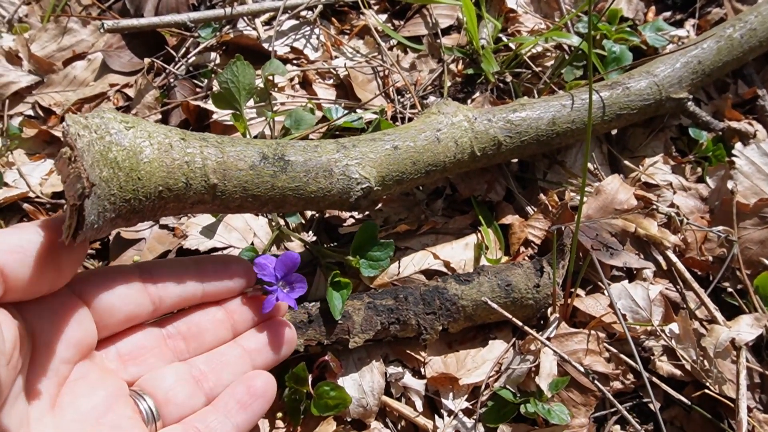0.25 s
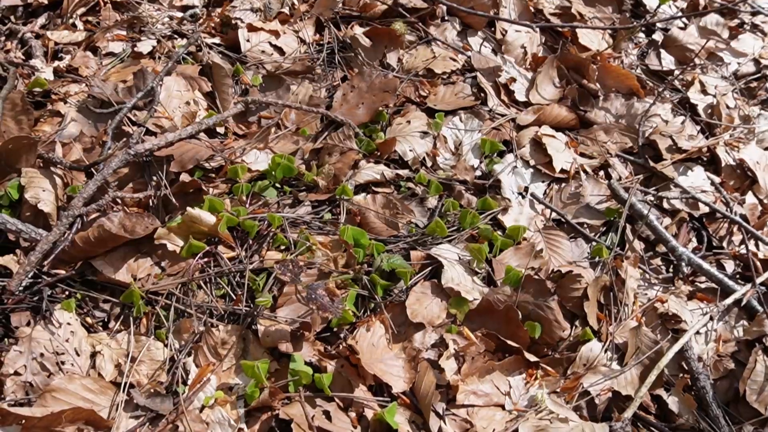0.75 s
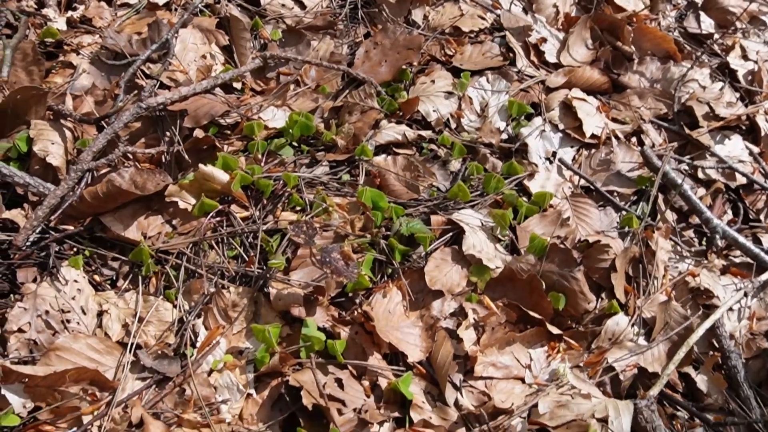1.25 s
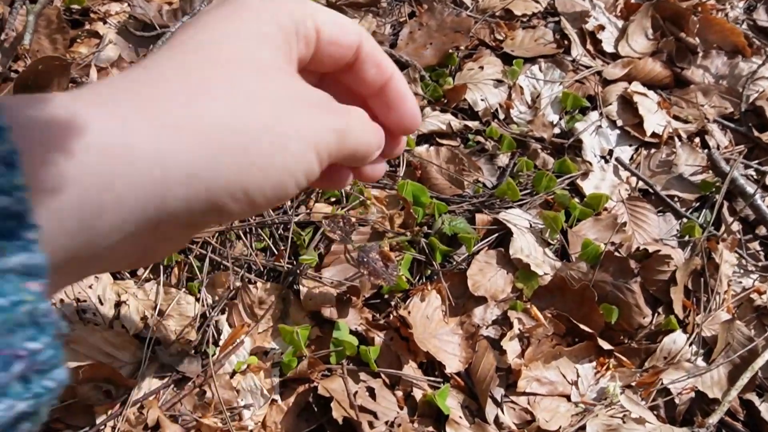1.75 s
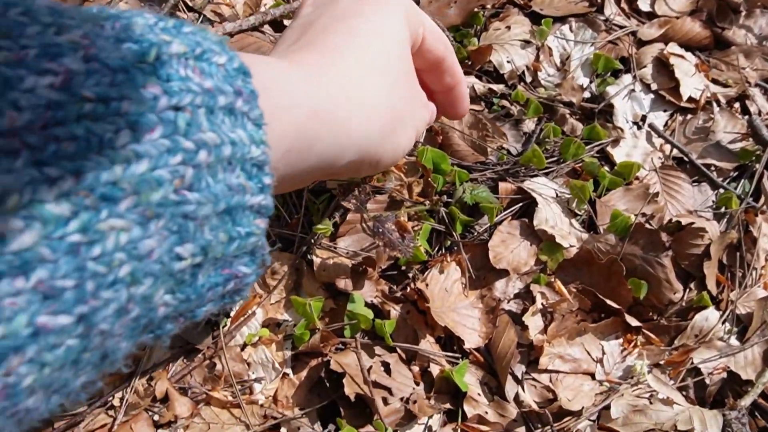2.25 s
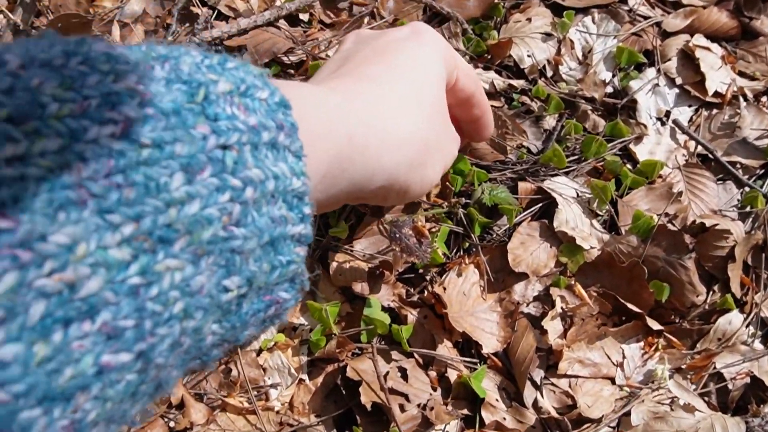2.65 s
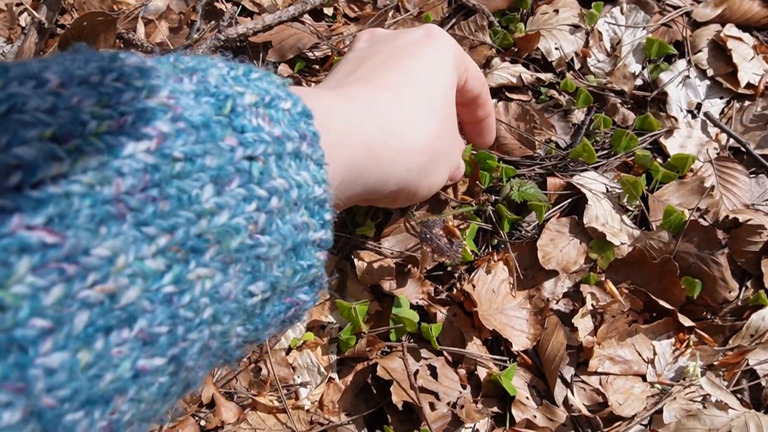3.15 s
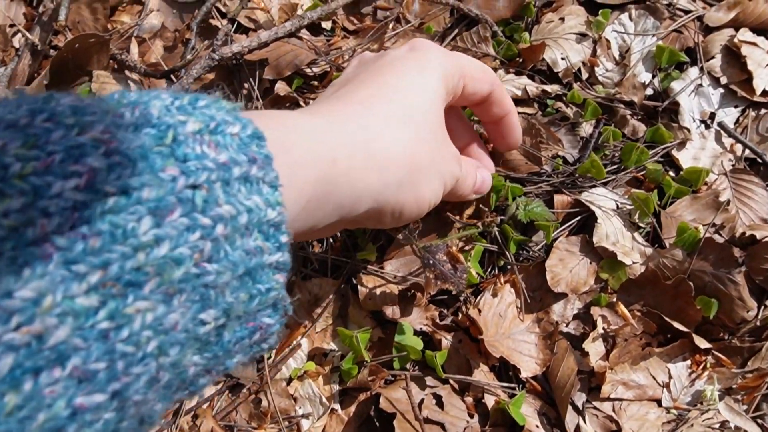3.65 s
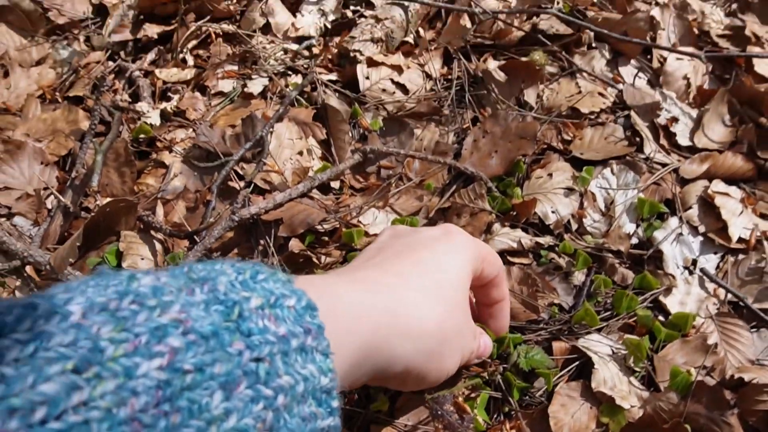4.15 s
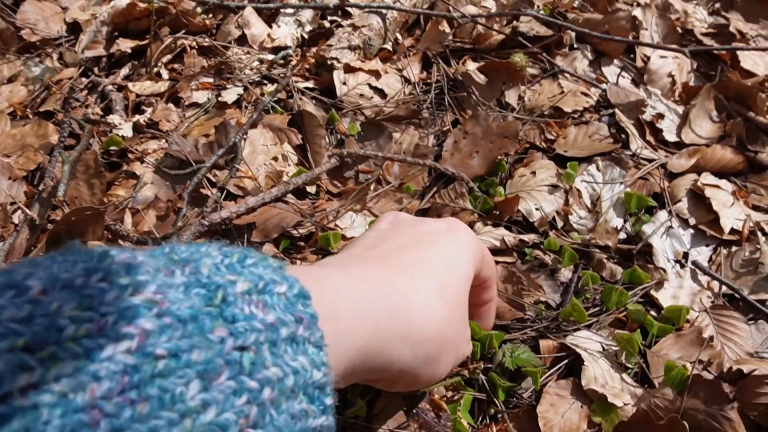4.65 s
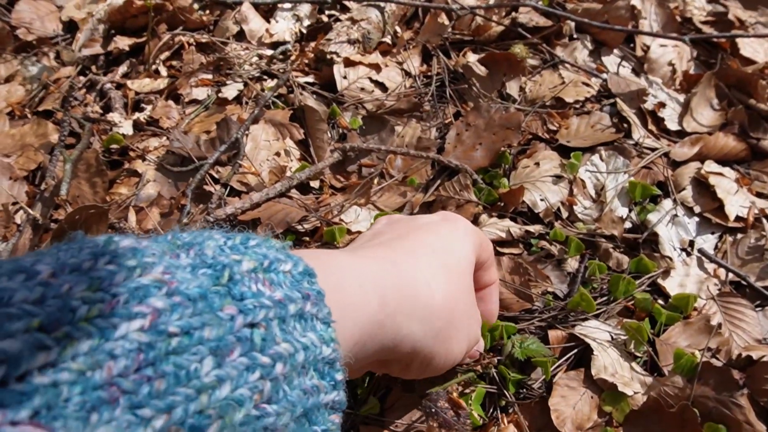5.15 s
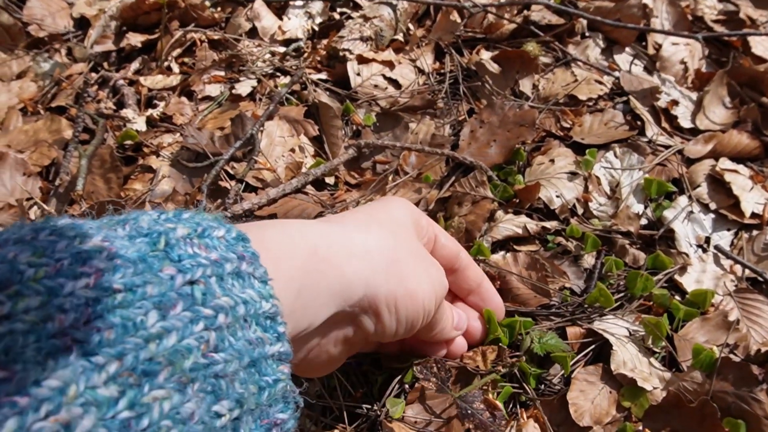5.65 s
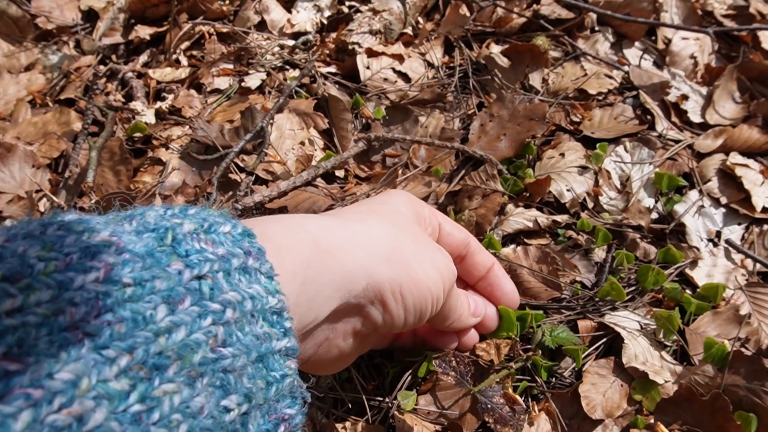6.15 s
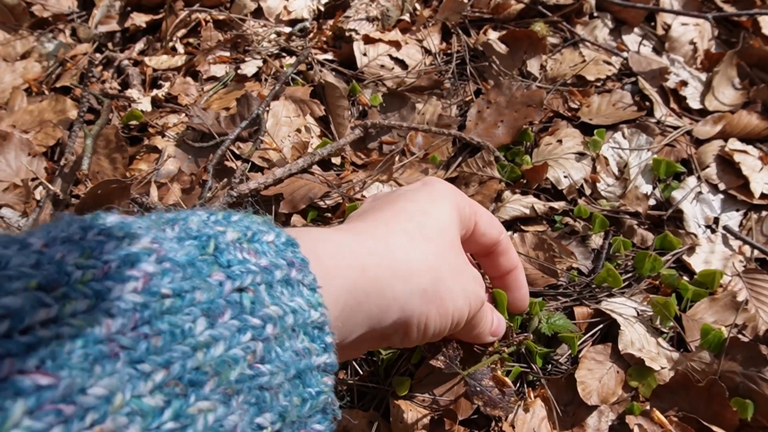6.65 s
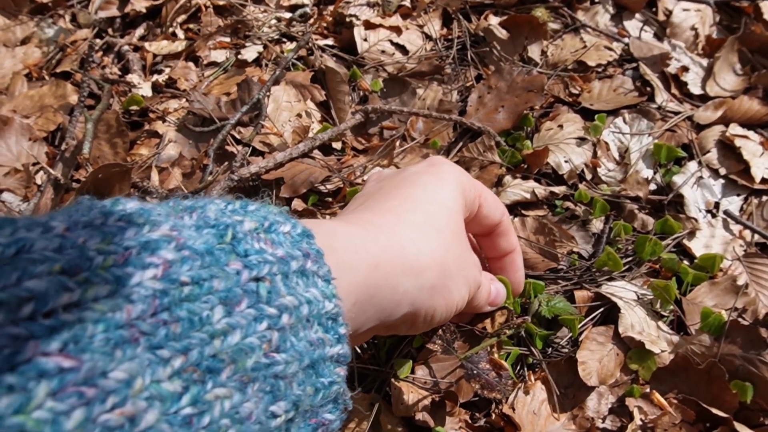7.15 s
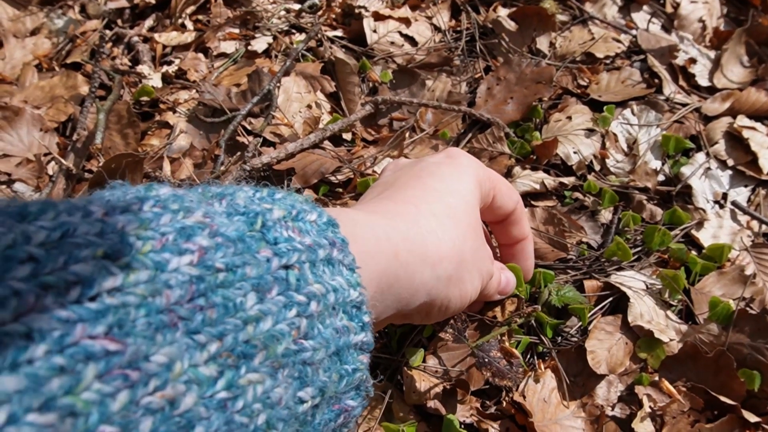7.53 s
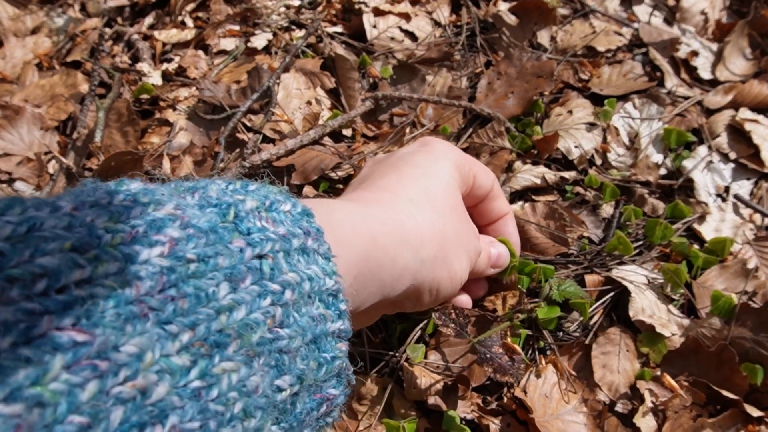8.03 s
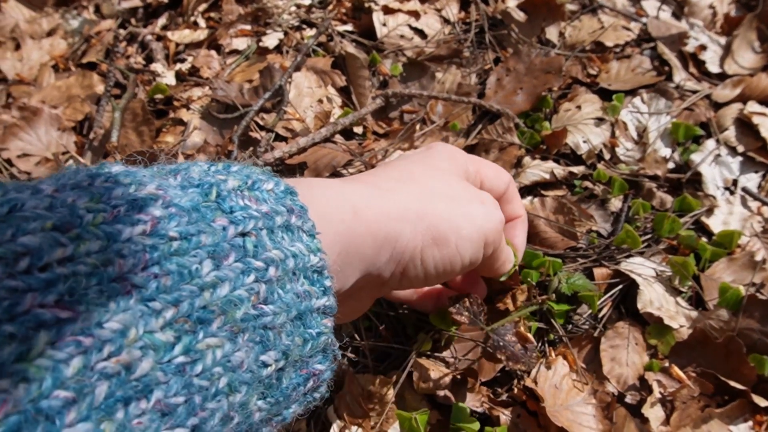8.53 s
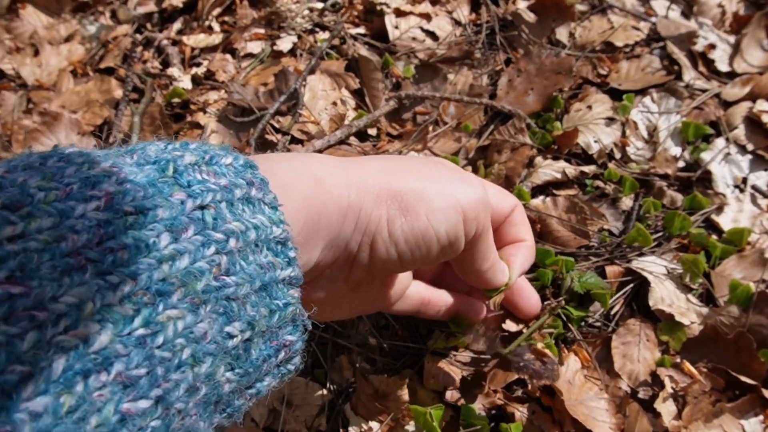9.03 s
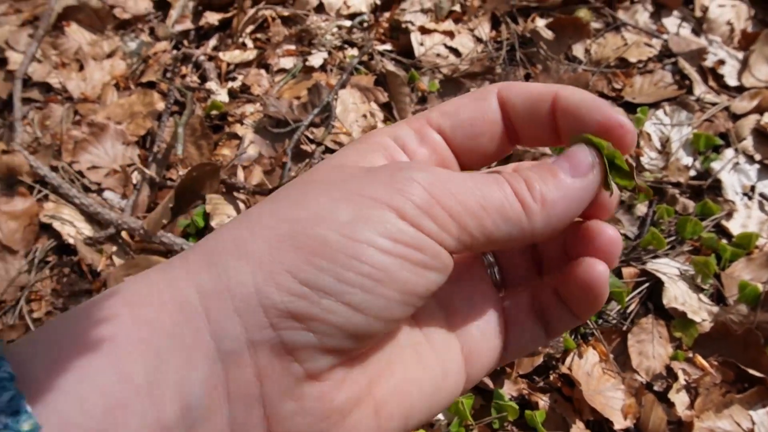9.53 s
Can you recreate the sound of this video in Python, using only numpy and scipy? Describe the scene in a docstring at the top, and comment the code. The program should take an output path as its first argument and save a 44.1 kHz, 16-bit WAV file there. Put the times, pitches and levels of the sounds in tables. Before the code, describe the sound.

Brief low hum and leaf rustle cut to near quiet, then a sleeve swish and delicate dry crackling that builds to brittle snapping.

```python
"""A woodland floor: a hand picks small plants out of dry leaf litter, heard from close by.
Leaves rustle (fluttering filtered noise) and crackle, stems snap and creak (short ragged noise bursts with a ring).
A sleeve swishes (noise with a moving centre); a low noise hum lasts half a second, then the sound cuts and fades in.
Bass murmur and microphone hiss (steady coloured noise) and two faint wavering sine tones lie underneath."""
import sys
import numpy as np
from scipy import signal
from scipy.fft import rfft, irfft
from scipy.io import wavfile
from scipy.ndimage import uniform_filter1d

SR = 44100
rng = np.random.default_rng(int(sys.argv[2]) if len(sys.argv) > 2 else 0)


def unload_wav(signal):
    """Save mono or channel-first audio to the path in sys.argv[1] as 16-bit WAV at rate SR, clipped to [-1, 1]."""
    wavfile.write(
        sys.argv[1],
        SR,
        np.round(np.clip(np.atleast_2d(signal).T, -1, 1) * 32767).astype(np.int16),
    )


N = 431298
CUT_S = .502

# crisp part of leaf noise: (frequency [Hz], relative density [dB])
LEAF_COLOUR = [(2400, -8), (4400, 0), (7000, -3), (11500, 0), (14500, -1), (16400, -4)]
# papery part of leaf noise: (frequency [Hz], relative density [dB])
BODY_COLOUR = [(250, -17), (500, -7.5), (1000, -1.5), (1600, 2), (2500, -1), (3500, -11.5)]


def undb(db):
    """dB to gain."""
    return 10 ** (np.asarray(db) / 20)


def rms1(x):
    """Scale each row to rms 1."""
    return x / np.sqrt(np.mean(x ** 2, axis=-1, keepdims=True))


def colour(x, points):
    """Filter the rows of x by (Hz, dB) points over log frequency; -80 dB outside them."""
    hz, db = np.transpose(points)
    f_hz = np.maximum(np.fft.rfftfreq(x.shape[-1], 1 / SR), 1)
    gain = undb(np.interp(np.log(f_hz), np.log(hz), db, left=-80, right=-80))
    return irfft(rfft(x) * gain, x.shape[-1])


def curves(rows):
    """Interpolate the columns of (s, value, ..) rows to one value a sample."""
    s, *columns = np.transpose(rows)
    return [np.interp(np.arange(N) / SR, s, c) for c in columns]


def walk(rate_hz):
    """Random levels, each held 1 / rate_hz and smoothed twice; rms 1."""
    hold = int(SR / rate_hz)
    steps = np.repeat(rng.standard_normal(N // hold + 1), hold)
    return rms1(uniform_filter1d(uniform_filter1d(steps, hold), hold)[:N])


def stirring():
    """Drive of the moving leaves in dB: finger strokes swell and die away over a steady stir, summed as power."""
    # steady stir: (time [s], drive [dB, before each layer's offset])
    stir = [(0, -70.5), (.45, -79), (.52, -79), (1.75, -65.5), (2.3, -71), (2.9, -71.5), (3.2, -55.5),
            (4.0, -57.5), (4.1, -82), (4.9, -60), (5.6, -58), (6.05, -64), (6.25, -71.5), (7.3, -69),
            (7.75, -66.5), (8.3, -54.5), (8.85, -50), (9.28, -64), (9.33, -71), (9.78, -71)]
    # pushes and pulls of the fingers: (time of peak [s], peak drive [dB, before offsets], length [s])
    strokes = [(0.232, -59.5, 0.12), (0.357, -57.5, 0.26), (1.823, -58.5, 0.16), (2.664, -60, 0.065),
               (2.963, -55, 0.25), (3.223, -52.5, 0.088), (3.258, -56, 0.025), (3.384, -57.5, 0.23),
               (3.542, -47, 0.16), (3.799, -45, 0.031), (3.923, -54, 0.26), (4.044, -45.5, 0.034),
               (4.263, -53, 0.4), (4.401, -44, 0.065), (4.459, -50, 0.075), (4.569, -53.5, 0.15),
               (4.75, -49, 0.33), (4.986, -49.5, 0.12), (5.081, -47, 0.051), (5.313, -48.5, 0.37),
               (5.493, -48, 0.15), (5.898, -54, .06), (6.177, -52.5, 0.078), (6.33, -62.5, 0.081),
               (6.489, -53, 0.19), (6.589, -54.5, 0.089), (6.683, -56.5, 0.084), (6.785, -52, 0.11),
               (6.892, -55.5, 0.06), (7.002, -54, 0.16), (7.166, -61, 0.14), (7.379, -53.5, 0.029),
               (7.832, -53.5, 0.25), (7.932, -41.5, 0.031), (8.092, -43.5, 0.2), (8.456, -46.5, 0.15),
               (8.57, -45.5, 0.061), (8.637, -49, 0.042), (8.727, -43, 0.27), (8.938, -38, 0.11),
               (9.033, -32.5, 0.11), (9.168, -42, 0.13), (9.257, -41, 0.067)]
    rise_share, edge_db = 0.37, -13  # share of the length spent rising; drive at both ends re peak
    t = np.arange(0, N, 32) / SR
    power = 0
    for peak_s, peak_db, length_s in strokes:
        away = np.where(t < peak_s, (peak_s - t) / rise_share, (t - peak_s) / (1 - rise_share)) / length_s
        power = power + undb(2 * (peak_db + edge_db * away))  # undb(2 x) is a power ratio
    steady_power = undb(2 * curves(stir)[0])
    return 10 * np.log10(np.interp(np.arange(N) / SR, t, power) + steady_power)


def rustle(stir_db, body_db, tilt_db, level_db=-7.5, flutter_db=2.8, own_db=2.5, patch_db=2.6, drift_db=1.2):
    """Leaves sliding on leaves: hiss that flutters with the fingers, its bands waxing and waning separately."""
    hiss = colour(rng.standard_normal(N), LEAF_COLOUR)
    tilt_db = tilt_db + drift_db * walk(12.)
    crisp = 0
    for band_hz in 2300 * 1.3 ** np.arange(9):
        octaves = max(np.log2(band_hz / 4000), 0)
        band_db = own_db * walk(70.) + patch_db * walk(12.) + tilt_db * octaves
        band = colour(hiss, [(band_hz / 1.6, -30), (band_hz, 0), (band_hz * 1.6, -30)])
        crisp = crisp + undb(band_db) * band
    papery_gain = undb(body_db + own_db * walk(50.) + patch_db * walk(11.))
    papery = papery_gain * rms1(colour(rng.standard_normal(N), BODY_COLOUR))
    return undb(stir_db + level_db + flutter_db * walk(120.)) * (rms1(crisp) + papery)


def cracks(s, peak_db, ring_hz, body_db, t60_s, ring_db, ragged_db, tail_db):
    """Each break is a ragged burst of a few ms: crisp noise, a short ring of the fragment, a papery body."""
    grain_len = 512
    lead = grain_len // 4
    t = (np.arange(grain_len) - lead) / SR
    chance = rng.standard_normal((len(s), 2 * grain_len + 1))
    length_s = t60_s * np.exp(.35 * chance[:, -1:])

    # fibres strain briefly (rise 6 x faster than the fall), then part; a weak settling tail follows
    envelope = 1000. ** (-np.abs(t) / length_s * np.where(t < 0, 6, 1))
    envelope = envelope + undb(tail_db) * 1000. ** (-np.abs(t) / (7 * length_s))
    ragged = undb(ragged_db * rms1(uniform_filter1d(chance[:, grain_len:-1], size=12)))
    burst = chance[:, :grain_len] * envelope * ragged

    f_hz, hz = np.fft.rfftfreq(grain_len, 1 / SR), ring_hz[:, None]
    resonance = 1 / (1 + 2j * (f_hz / hz - hz / (f_hz + 1))) ** 2  # two stages of Q 2
    ring = irfft(rfft(burst) * resonance, grain_len)

    # thick twigs ring low and strongly, thin leaves mostly hiss
    ring_gain = undb(ring_db - 3.5 * np.log2(hz / 4000))
    crisp = rms1(rms1(colour(burst, LEAF_COLOUR)) + ring_gain * rms1(ring))
    grain = crisp + undb(body_db)[:, None] * rms1(colour(burst, BODY_COLOUR))
    grain *= signal.windows.tukey(grain_len, .4)
    loudest_rms = np.sqrt(uniform_filter1d(grain ** 2, size=24).max(axis=1, keepdims=True))
    grain *= undb(peak_db)[:, None] / (2 * loudest_rms)  # peak taken as twice the loudest short rms

    out = np.zeros(N + 2 * grain_len)
    np.add.at(out, (s * SR).astype(int)[:, None] + np.arange(grain_len), grain)
    return out[lead:N + lead]


def crackle(stir_db, body_db, tilt_db, count=4500, spread_db=5., lift_db=4.5, most_db=12.):
    """Countless small leaf breaks at random moments; a few are larger; duller litter rings lower."""
    chance = rng.random((count, 4))
    at = (chance[:, 0] * (N - 1)).astype(int)
    excess_db = -spread_db * np.log(1 - chance[:, 1])
    peak_db = stir_db[at] + lift_db + most_db * np.tanh(excess_db / most_db)  # excess saturates at most_db
    ring_hz = np.minimum(3820.0 * 3.65 ** chance[:, 2] * undb(tilt_db[at]), 15000)
    grain_body_db = body_db[at] + 16. * (chance[:, 3] - .5)
    return cracks(at / SR, peak_db, ring_hz, grain_body_db, t60_s=.003, ring_db=1., ragged_db=3., tail_db=-15.)


def snaps():
    """The breaks that stand out one by one, each with its own ring and body."""
    # (time [s], nominal peak [dB], ring [Hz], papery body re crisp part [dB])
    snap_rows = [(0.081, -42, 6800, -21), (0.16, -45, 4630, -20), (0.193, -43, 4800, -7),
                 (0.233, -31.5, 6160, -14), (0.373, -37, 1710, -24), (0.493, -36, 4960, -24),
                 (1.034, -44, 8000, -16), (1.071, -46.5, 355, -16), (1.289, -40, 850, 0),
                 (1.63, -38, 8100, -26), (2.049, -31.5, 6060, -14), (1.842, -38.5, 3500, 2),
                 (2.281, -45, 6040, -4), (2.519, -52.5, 2200, 7), (2.601, -46.5, 4980, -12),
                 (2.689, -48, 4800, -1), (2.753, -45, 6030, -7), (2.807, -39.5, 4860, -4),
                 (2.829, -51, 400, -15), (2.847, -44.5, 3640, -8), (2.943, -39, 9840, -13),
                 (3.01, -38, 5000, -4), (3.275, -31, 12000, -9), (3.453, -31, 4550, -7),
                 (3.469, -21.5, 12700, -10), (3.572, -34, 6670, -26), (3.802, -30, 8410, -28),
                 (3.904, -24, 1640, -17), (3.99, -35.5, 3930, -22), (4.044, -30, 9000, -23),
                 (4.024, -35, 8740, -18), (4.298, -33, 1690, -34), (4.405, -31, 1500, -25),
                 (4.59, -31.5, 6900, -12), (4.599, -30.5, 5040, -4), (4.618, -32.5, 5090, -7),
                 (4.746, -33, 6170, -34), (4.84, -32, 4800, -18), (4.994, -27.5, 5000, -1),
                 (5.091, -28, 9800, -8), (5.127, -33, 4900, 1), (5.156, -34.5, 3000, 7),
                 (5.25, -30, 11900, -29), (5.319, -29, 10200, -20), (5.411, -32, 8000, -4),
                 (5.446, -26.5, 5030, -1), (5.446, -41, 432, -20), (5.485, -34, 1790, -6),
                 (5.516, -27, 4800, -12), (5.592, -30, 6300, -31), (5.64, -32, 8500, -9),
                 (5.736, -31.5, 5840, -34), (5.988, -36.5, 13200, -10), (6.057, -36.5, 6600, -25),
                 (6.091, -33.5, 9300, -19), (6.14, -37, 10400, -28), (6.164, -36, 4000, -6),
                 (6.43, -42, 10900, -25), (6.534, -37, 4390, -15), (6.697, -29, 12300, -16.5),
                 (6.781, -37.5, 4030, 4), (6.822, -28.5, 9500, -12), (6.899, -30.5, 10100, -10),
                 (6.948, -41.5, 10100, -26), (7.04, -30, 6300, -8), (7.137, -35.5, 7490, -5),
                 (7.222, -41, 5060, -6), (7.309, -44.5, 9000, -2), (7.495, -43.5, 3000, 1),
                 (7.713, -37.5, 3380, -3), (7.727, -34.5, 4820, 0), (7.857, -23, 6700, -9),
                 (7.933, -32, 3460, -6), (7.977, -21.5, 6070, -11.5), (8.005, -27.5, 6780, -14),
                 (8.088, -9.5, 12300, -12.5), (8.093, -29, 11500, -18), (8.165, -28.5, 8300, -20),
                 (8.299, -30.5, 3600, -3), (8.488, -21.5, 13100, -32), (8.489, -18, 14300, -16),
                 (8.566, -36, 3930, -15), (8.722, -33, 3780, -12), (8.67, -29.5, 3980, -33),
                 (8.735, -15.5, 10400, -18), (8.795, -24, 9260, -7), (8.873, -29, 6890, -9),
                 (8.909, -18, 6040, -26), (8.914, -14, 10600, -21), (8.919, -16.5, 9100, -8),
                 (8.924, -9.5, 9700, -10.5), (8.936, -26, 3350, -27), (8.949, -27, 3820, -24),
                 (9.018, -10.5, 4860, -10), (9.045, -10.5, 11600, -14), (9.058, -13.5, 12000, -29),
                 (9.071, -18.5, 9420, -15), (9.174, -27, 6620, -27), (9.242, -24.5, 10500, -33),
                 (9.47, -38.5, 3100, -1)]
    return cracks(*np.transpose(snap_rows), t60_s=.0042, ring_db=-2., ragged_db=2., tail_db=-21.)


def creaks():
    """Quick runs of thin high ticks as a stem sticks and slips."""
    # (start [s], nominal peak of each tick [dB])
    creak_rows = [(4.954, -36), (5.379, -45)]
    slip_rate_hz, ring_hz, slips = 140, 14200, 6
    s, peak_db = (np.repeat(c, slips) for c in np.transpose(creak_rows))
    s = s + np.tile(np.arange(slips), len(creak_rows)) / slip_rate_hz
    return cracks(s, peak_db, ring_hz + 0 * s, -30 + 0 * s, t60_s=.004, ring_db=22., ragged_db=1., tail_db=-30.)


def sleeve(octave_db=-4.0):
    """A knitted sleeve brushes past: broad smooth noise whose centre follows the arm."""
    # (time [s], level [dB], centre [Hz])
    swish = [(.9, -77, 2000), (1.05, -64, 2010), (1.2, -74.5, 2150), (1.5, -64, 2770), (1.85, -63.5, 3170),
             (2.15, -67, 3230), (2.4, -81, 2410), (9.6, -76, 2500), (9.72, -67.5, 2500)]
    level_db, centre_hz = curves(swish)
    bands_hz = 500 * 2 ** np.arange(0, 4.6, .5)
    total = 0
    for hz in bands_hz:
        band = rms1(colour(rng.standard_normal(N), [(hz / 2, -20), (hz, 0), (hz * 2, -20)]))
        total = total + band * undb(octave_db * np.log2(hz / centre_hz) ** 2)
    return undb(level_db) * rms1(total)


def hum():
    """A rough low drone of noise, strongest near 400 Hz, that throbs unevenly and stops at the cut."""
    # (time [s], level before throb [dB])
    hum_level = [(0.0, -49), (0.384, -54.5), (0.5, -62.5)]
    # (frequency [Hz], relative density [dB])
    hum_colour = [(60, -44), (146, -14), (238, -12), (393, 5.5), (519, -13.5), (566, -49), (780, -57)]
    throb_db = 1
    level_db = curves(hum_level)[0] + throb_db * walk(43.)
    return undb(level_db) * rms1(colour(rng.standard_normal(N), hum_colour)) * (np.arange(N) < CUT_S * SR)


def tones(waver=.012, level_drift_db=2, fade_s=.2):
    """Faint sines that fade in and out and drift a little in pitch and level."""
    # (start [s], end [s], mean frequency [Hz], rms level before drift [dB])
    tone_rows = [(3.2, 4.8, 153, -80), (8.3, 9.78, 297, -78)]
    t = np.arange(N) / SR
    total = 0
    for start_s, end_s, hz, level_db in tone_rows:
        gain = undb(level_db + level_drift_db * walk(5.))
        fade = np.clip(np.minimum(t - start_s, end_s - t) / fade_s, 0, 1)
        phase = 2 * np.pi * np.cumsum(hz * (1 + waver * walk(4.))) / SR
        total = total + gain * fade * np.sqrt(2) * np.sin(phase)
    return total


def air(hiss_db=-72.5):
    """Distant woodland murmur, mostly bass noise, under steady microphone hiss."""
    # (time [s], level [dB])
    murmur_level = [(.5, -63.5), (1.2, -66.5), (3.5, -69.5), (7.5, -68.5), (8.8, -67.5), (9.78, -67)]
    # (frequency [Hz], relative density [dB])
    murmur_colour = [(20, -20), (40, -6), (60, -2), (145, -0.5), (300, -0.5), (550, -9.5), (900, -9.5),
                     (2000, -20), (2600, -47)]
    # (frequency [Hz], relative density [dB])
    hiss_colour = [(500, -3), (2500, 1), (6000, 1), (11000, 0.5), (16500, -4)]
    murmur = undb(curves(murmur_level)[0]) * rms1(colour(rng.standard_normal(N), murmur_colour))
    return murmur + undb(hiss_db) * rms1(colour(rng.standard_normal(N), hiss_colour))


def scene():
    """Sum the layers; rustle and crackle share one stirring drive and litter colour."""
    # litter colour: (time [s], papery body re crisp part [dB], treble tilt above 4 kHz [dB per octave])
    litter = [(0.3, -12.5, -2.5), (3.5, -4, -0.5), (4.3, -5, -3), (5.3, -5.5, 0.5), (6.3, -6.5, 0),
              (7.5, -7, -0.5), (8.0, -6, -1.5), (8.7, -7.5, -2), (9.2, -8.5, -1)]
    leaves = stirring(), *curves(litter)
    picking = snaps() + creaks() + crackle(*leaves) + rustle(*leaves)
    return (picking + sleeve() + hum() + tones() + air())[None]


def record(dry):
    """A hard cut with a short fade-in after it, then a steep low-pass."""
    fade_in_s, top_hz = .03, 15900
    t = np.arange(N) / SR - CUT_S
    cut = np.where(t < 0, 1, np.clip(t / fade_in_s, 0, 1))
    low_pass = signal.ellip(10, .2, 70, top_hz, fs=SR, output="sos")
    return signal.sosfilt(low_pass, dry * cut)


dry = scene()
out = record(dry)
unload_wav(out)
```